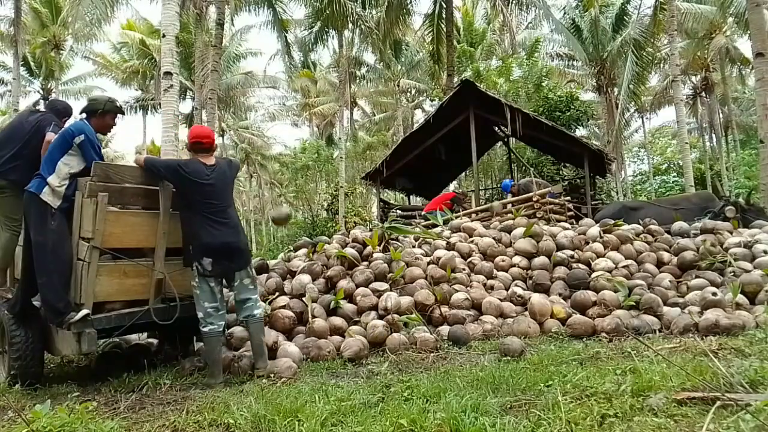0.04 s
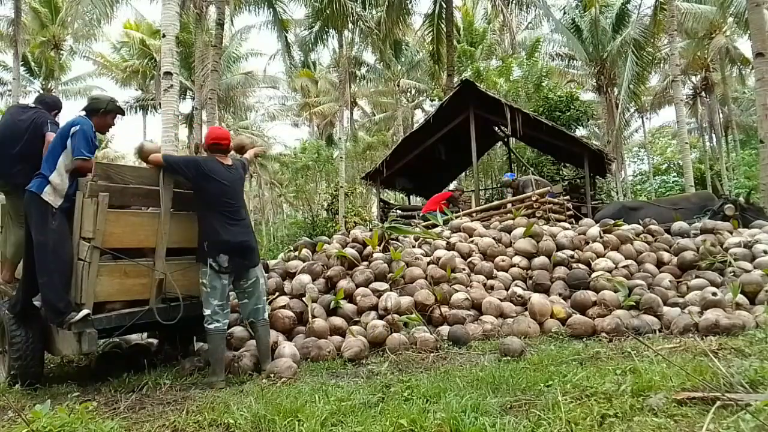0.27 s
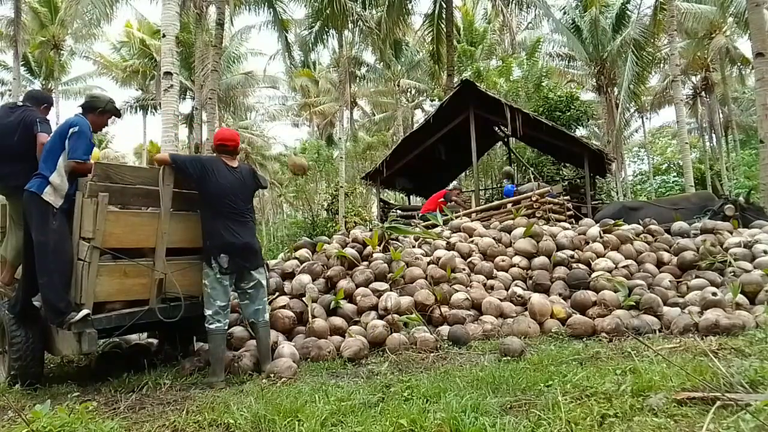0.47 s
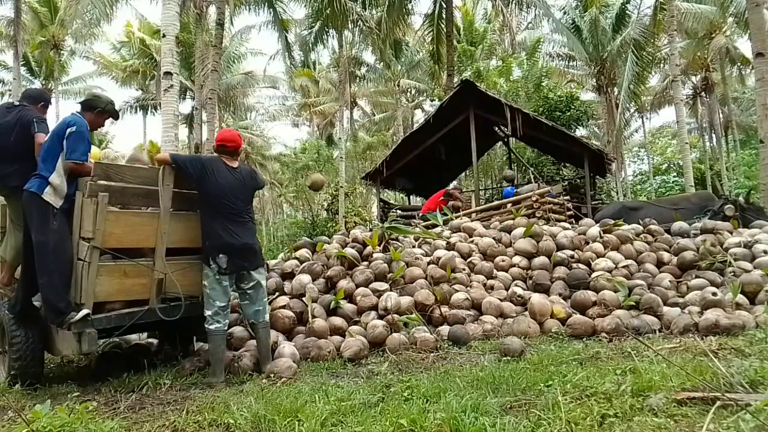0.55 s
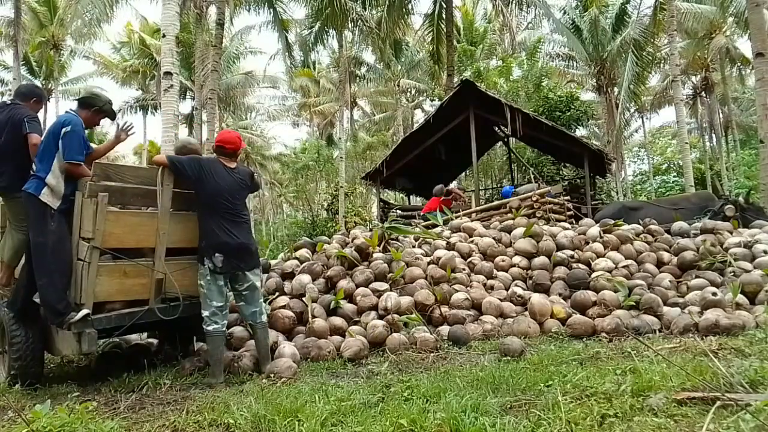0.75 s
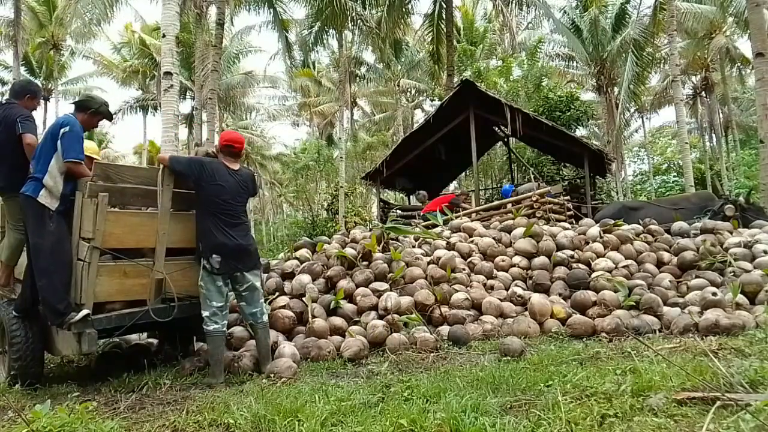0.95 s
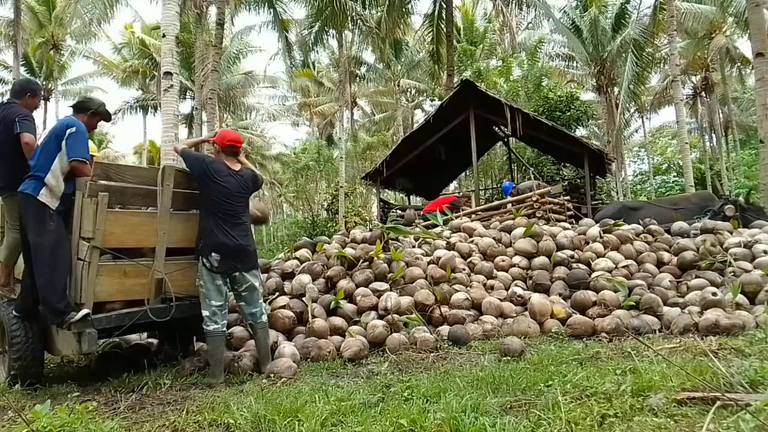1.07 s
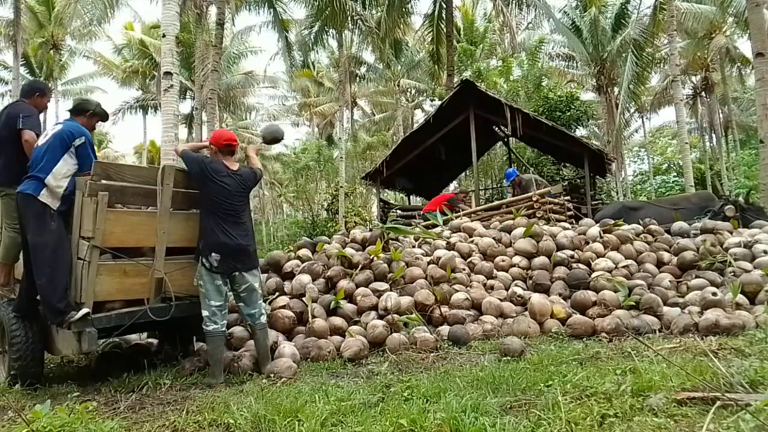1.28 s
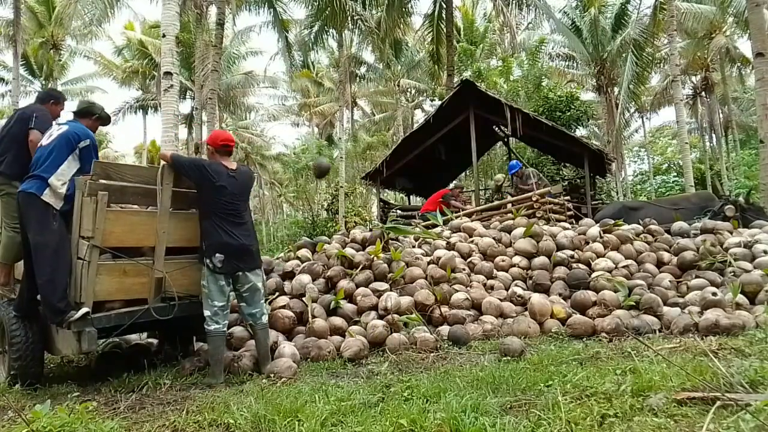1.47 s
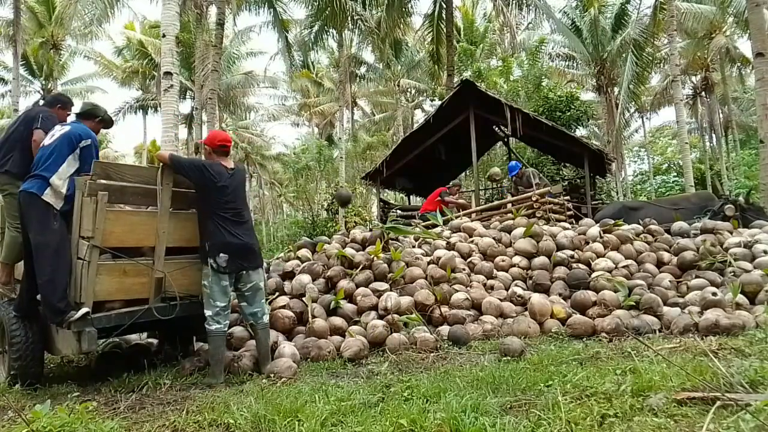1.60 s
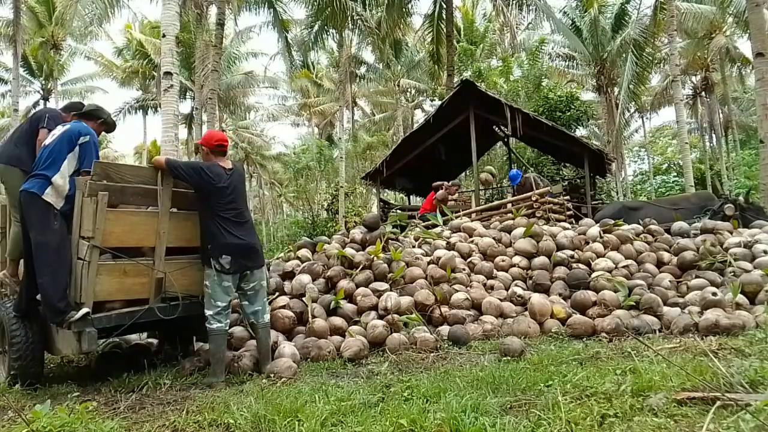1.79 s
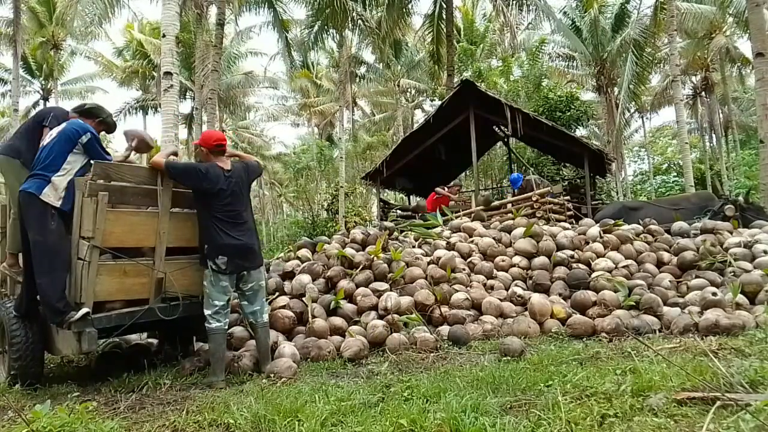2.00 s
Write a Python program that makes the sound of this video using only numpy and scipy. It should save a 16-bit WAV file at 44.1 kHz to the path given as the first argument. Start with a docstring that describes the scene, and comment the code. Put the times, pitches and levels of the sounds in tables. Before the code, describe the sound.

Coconuts tossed into a wooden cart land in three hollow, dry knocks over soft leafy rustle

```python
"""In a palm grove, husked coconuts are tossed into a wooden farm cart in front of one small microphone.
They clack on the load as ringing shell modes with bursts of husk noise; fibres snap as decaying clicks.
The plank bed thumps and the side boards knock as struck modes; nuts bump as damped notes and roll as grains.
A short ring inside the cart and a scattered echo from the palm trunks answer, over the constant rustle
and rumble of the grove and one tiny falling bird note; the microphone rings in the high treble."""
import sys
import numpy as np
from scipy import signal
from scipy.fft import rfft, irfft, next_fast_len
from scipy.io import wavfile
from scipy.ndimage import map_coordinates

SR = 44100
rng = np.random.default_rng(int(sys.argv[2]) if len(sys.argv) > 2 else 0)


def file_out(sig):
    """Save sig as 16-bit WAV at sys.argv[1]."""
    # one column per channel
    cols = np.atleast_2d(sig).T
    # limit, then scale
    lim = np.clip(cols, -1, 1)
    pcm = np.round(lim * 32767).astype(np.int16)
    wavfile.write(sys.argv[1], SR, pcm)


N = 90404
T = np.arange(SR // 2) / SR  # the half second given to each single sound, in seconds


def amp(db):
    """Decibels to gain."""
    return 10 ** (np.asarray(db) / 20)


def unit(x):
    """Scale to rms 1."""
    return x / np.sqrt(np.mean(x ** 2) + 1e-20)


def add(track, start_s, sound):
    """Mix a sound into a track at a time in seconds, cutting what runs past the end."""
    i = max(0, round(start_s * SR))
    track[i:i + len(sound)] += sound[:len(track) - i]


def coloured(x, points):
    """Causal minimum-phase filter through the given (Hz, dB) points, made by folding the cepstrum."""
    size = 2 * next_fast_len(len(x))
    hz, db = np.transpose(points)
    bin_hz = np.fft.rfftfreq(size, 1 / SR)
    response_db = np.interp(np.log(bin_hz + 1), np.log(hz), db)
    cepstrum = irfft(np.log(amp(response_db)), size)
    cepstrum[1:size // 2] *= 2
    cepstrum[size // 2 + 1:] = 0
    response = np.exp(rfft(cepstrum))
    return irfft(rfft(x, size) * response)[:len(x)]


def noise(points, size):
    """Coloured noise of rms 1."""
    return unit(coloured(rng.standard_normal(size), points))


def wobble(rate):
    """A smooth random curve through rate knots a second."""
    knots = rng.standard_normal(200)
    return map_coordinates(knots, [np.arange(N) * rate / SR], mode="wrap")


SAG_S = 0.0073  # time constant of the pitch sag


def cycles(sag):
    """A contact is stiffest at first: time as a mode counts it while its pitch relaxes from 1 + sag to 1."""
    return T + sag * SAG_S * (1 - np.exp(-T / SAG_S))


MODE_SCATTER_DB = 0.5  # each blow excites the modes a little differently


def struck(modes, pitch, crush_s, grit, sag=0):
    """Damped modes rung by one blow, then by the crumbling of the husk; grit is the crumble's rms share."""
    hz, db, t60 = np.transpose(modes)[:, :, None]
    gain = amp(db + MODE_SCATTER_DB * rng.standard_normal(hz.shape))
    decay = np.exp(-np.log(1000) * T / t60)
    ring = (gain * decay * np.sin(2 * np.pi * hz * pitch * cycles(sag))).sum(0)
    crumbling_force = rng.standard_normal(len(T)) * np.exp(-T / crush_s)
    crumble = signal.fftconvolve(crumbling_force, ring)[:len(T)]
    level = ring.std() / np.linalg.norm(gain)  # longer rings carry more
    return unit(unit(ring) + grit * unit(crumble)) * level


# The air of the grove, as the shape of its spectrum. Each row: frequency in Hz, relative level in dB per Hz.
GROVE_SPECTRUM = [(30, 16), (110, -2.5), (170, 4), (270, 2.5), (450, -0.5), (1000, -1), (2000, -5),
                  (4000, -9), (6500, -11.5), (9000, -15.5), (12500, -19.5), (16000, -28.5)]
GROVE_DB, BREEZE_DB, RUMBLE_SWELL_DB = -49.5, 0.5, 2.5  # base level; depths of the random swells


def grove():
    """Frond rustle that barely swells over an uneven low rumble, split from one coloured noise at 450 Hz."""
    air = noise(GROVE_SPECTRUM, N)
    rumble = signal.sosfiltfilt(signal.butter(2, 450, fs=SR, output="sos"), air)
    rustle = (air - rumble) * amp(BREEZE_DB * wobble(8.4))
    swelling_rumble = rumble * amp(RUMBLE_SWELL_DB * wobble(21.68))
    return amp(GROVE_DB) * (rustle + swelling_rumble)


# Nuts rolling over the load. Each row: start in seconds, length in seconds, level in dB.
ROLLS = [(0, 0.074, -52), (0.276, 0.062, -45.5), (.88, .06, -56), (.99, .09, -46), (1.07, .13, -57),
         (1.234, 0.06, -48), (1.311, 0.072, -50.5), (1.829, 0.092, -57.5)]
# Husk scraping on husk, as a filter shape. Each row: frequency in Hz, relative level in dB.
ROLLING_SPECTRUM = [(100, -6), (300, -11), (700, 1), (1350, 7), (2500, 0), (5000, -2.5), (9000, -8.5),
                    (16000, -5.5)]


def rolls():
    """Husk scrapes on husk in a short swell of fine grains of random strength."""
    out = np.zeros(N)
    for start_s, length_s, db in ROLLS:
        grains = rng.standard_normal(len(T)) * rng.exponential(size=len(T))
        swell = np.sin(np.pi * np.minimum(T / length_s, 1))
        add(out, start_s, amp(db) * swell * unit(coloured(grains, ROLLING_SPECTRUM)))
    return out


# What cart and trunks send back, as the shape of its spectrum. Each row: frequency in Hz, relative level in dB.
ECHO_COLOUR = [(100, -4), (300, -2), (700, -1), (1500, -4), (4000, -1.5), (9000, -0.5), (15000, -1.5)]
CART_DB, CART_DECAY_S = -9, 0.016
ECHO_DB, ECHO_DELAY_S, ECHO_SPREAD = -15, 0.084, 0.42  # strongest delay; spread in natural log of time


def echoes(x):
    """A short decaying ring inside the cart, then a soft cloud of noise-like returns from the palm trunks."""
    out = np.zeros(N)
    cart_ring = unit(np.exp(-T / CART_DECAY_S))
    cloud = unit(np.exp(-(np.log((T + 1 / SR) / ECHO_DELAY_S) / ECHO_SPREAD) ** 2 / 2))
    envelope = np.hypot(amp(CART_DB) * cart_ring, amp(ECHO_DB) * cloud) / np.sqrt(len(T))
    for i in range(0, N, len(T)):  # each half second gets freshly drawn returns
        returns = envelope * noise(ECHO_COLOUR, len(T))
        add(out, i / SR, signal.fftconvolve(x[i:i + len(T)], returns))
    return out


# Weight landing on the plank bed. Each row: start in seconds, level in dB, pitch ratio.
THUDS = [(.076, -37, 0.84), (0.2206, -27, 0.97), (.249, -41, 1.1), (.8238, -26.5, 0.874),
         (0.8343, -28, 0.92), (0.962, -26, .86), (1.263, -35, 1.12), (1.292, -34, 1.05), (1.334, -35, 0.89),
         (1.655, -42, 1.23), (1.770, -34, 1.3)]
# Modes of the loaded bed. Each row: frequency in Hz at pitch ratio 1, relative level in dB, 60 dB decay in seconds.
BED_MODES = [(141, -5.5, 0.054), (188, -1.5, 0.065), (250, -0.5, 0.067), (300, -0.5, 0.052),
             (397, -10, 0.099), (550, -1, 0.0084)]
BED_CRUSH_S, BED_GRIT = 0.018, 0.61


def bed_thuds():
    """The loaded plank bed thumps in low, damped modes."""
    out = np.zeros(N)
    for start_s, db, pitch in THUDS:
        add(out, start_s, amp(db) * struck(BED_MODES, pitch, BED_CRUSH_S, BED_GRIT))
    return out


# Nut on nut. Each row: start in seconds, shell level in dB, husk crack level in dB before halving,
# crush time constant in seconds, shell pitch ratio.
CLACKS = [(0.0767, -36.5, -36.5, 0.0037, .9), (0.1989, -28, -44, 0.002, 0.91),
          (0.2037, -36, -51, 0.0015, 0.78), (0.2077, -13, -15.5, 0.0015, 1),
          (0.2134, -31, -34, 0.0011, 1.24), (0.2202, -25.5, -23, 0.0023, 1.1),
          (0.2232, -22.5, -42, 0.0054, 0.88), (.247, -39, -34, 0.0039, 1.7),
          (0.8236, -24.5, -18.5, 0.0029, 1.02), (0.8332, -25, -28, 0.0038, 0.95),
          (0.8416, -32, -52, 0.0026, .92), (0.9621, -34.5, -33, 0.0027, .8),
          (0.9687, -29.5, -33, 0.011, 0.95), (1.264, -37, -49, .005, 1.06),
          (1.2912, -30, -28, 0.0044, 0.94), (1.2932, -28, -25, 0.0046, .82), (1.664, -34, -46, .005, 0.47),
          (1.671, -37.5, -48, .005, .7), (1.680, -42, -49, .004, 0.65), (1.765, -30.5, -30.5, 0.0027, 0.74),
          (1.7708, -28.5, -38, 0.011, 0.87), (1.807, -36, -40.5, 0.0076, 0.85),
          (2.039, -38.5, -45, 0.0026, 0.81)]
# Modes of the hard shell. Each row: frequency in Hz at pitch ratio 1, relative level in dB, 60 dB decay in seconds.
SHELL_MODES = [(1140, -8.5, 0.042), (1443, 2.5, 0.04), (1636, -7, 0.032), (1763, -2, 0.037),
               (1912, 1, 0.031), (2150, -4.5, .03), (2605, -3.5, 0.018), (2880, -5, 0.02),
               (3348, 0.5, 0.018), (3570, -6.5, 0.015)]
# Cracking husk, as the shape of its spectrum. Each row: frequency in Hz, relative level in dB per Hz.
HUSK_SPECTRUM = [(100, -18), (800, -11.5), (1500, 4), (2500, 0), (3500, 3.5), (4400, -1), (7500, -4),
                 (11000, -5.5), (16000, -3)]
SHELL_GRIT = 0.23
SHELL_LOWEST_HZ = 1124  # at pitch ratio 1; the shell is steeply cut below this


def clacks():
    """Each contact rings the hard shell and cracks the dry husk around it."""
    out = np.zeros(N)
    for start_s, shell_db, crack_db, crush_s, pitch in CLACKS:
        low_cut = signal.butter(8, SHELL_LOWEST_HZ * pitch, "high", fs=SR, output="sos")
        shell = signal.sosfilt(low_cut, struck(SHELL_MODES, pitch, crush_s, SHELL_GRIT))
        crack = np.exp(-T / crush_s) * noise(HUSK_SPECTRUM, len(T)) / 2
        add(out, start_s, amp(shell_db) * shell)
        add(out, start_s, amp(crack_db) * crack)
    return out


# Dry fibres snapping. Each row: start in seconds, level in dB, decay time constant in seconds, pitch ratio.
SNAPS = [(0.2081, -6, 0.00063, 0.88), (.2148, -22, .0005, 1), (0.2215, -24, 0.0023, 1.45),
         (0.8244, -19, 0.00042, 0.88), (.8363, -23, .002, 1.0), (1.2326, -20, .0013, 1.08),
         (1.2364, -26.5, 0.0018, 0.94), (1.2704, -24, .0004, 1), (1.3194, -29, 0.00055, 1.1)]
# Breaking fibre, as a filter. Each row: frequency in Hz at pitch ratio 1, level in dB.
FIBRE_SPECTRUM = [(300, -41), (1000, -22), (3300, -10), (4600, -15), (6000, -12.5), (8000, -5), (9000, -1),
                  (11000, -8.5), (16000, -9)]
SNAP_CLICK = 2.5  # force of the first break, over the splintering that follows


def snaps():
    """Husk fibres break with a thin tick and splinter briefly."""
    out = np.zeros(N)
    for start_s, db, decay_s, pitch in SNAPS:
        force = np.exp(-T / decay_s) * rng.standard_normal(len(T)) / 2
        force[0] = SNAP_CLICK
        spectrum = np.multiply(FIBRE_SPECTRUM, [pitch, 1])  # shifts the frequencies only
        add(out, start_s, amp(db) * coloured(force, spectrum))
    return out


# Nuts settling softly deep in the load. Each row: start in seconds, level in dB, settled frequency in Hz.
BUMPS = [(0.297, -32.5, 285), (0.311, -36, 149), (0.336, -42.5, 140), (0.363, -40.5, 140.3),
         (.565, -46.5, 222), (0.674, -37, 252), (0.689, -47, 148), (.905, -39, 202), (1.352, -38, 217),
         (1.414, -36, 244), (1.464, -42.5, 250), (1.658, -42, 200), (1.683, -32.5, 288), (1.816, -42, 250),
         (1.875, -40.5, 211)]
BUMP_RISE_S, BUMP_DECAY_S = 0.003, 0.012
BUMP_SAG = 0.24  # extra pitch at first contact, as a fraction


def bumps():
    """A nut cushioned by the others gives one dull, sagging, quickly damped note."""
    out = np.zeros(N)
    for start_s, db, hz in BUMPS:
        envelope = (1 - np.exp(-T / BUMP_RISE_S)) * np.exp(-T / BUMP_DECAY_S)
        note = np.sin(2 * np.pi * hz * cycles(BUMP_SAG))
        add(out, start_s, amp(db) * envelope * note)
    return out


# Hollow knocks on the side boards. Each row: start in seconds, level in dB, pitch ratio.
KNOCKS = [(1.2938, -19.5, 1.0), (1.670, -34.5, 0.85), (1.774, -33, 1.05), (1.93, -43.5, 1.02)]
# Modes of a side board. Each row: settled frequency in Hz at pitch ratio 1, relative level in dB,
# 60 dB decay in seconds.
BOARD_MODES = [(609, 0.5, 0.065), (692, -7, 0.024), (990, -2.5, .026), (1096, 3, 0.043), (1297, -8, 0.033),
               (1480, -4, 0.035)]
BOARD_CRUSH_S, BOARD_GRIT = 0.008, 0.5
BOARD_SAG = 0.088  # extra pitch at first contact, as a fraction


def board_knocks():
    """The freer side boards knock hollowly, their pitch sagging a little after contact."""
    out = np.zeros(N)
    for start_s, db, pitch in KNOCKS:
        add(out, start_s, amp(db) * struck(BOARD_MODES, pitch, BOARD_CRUSH_S, BOARD_GRIT, BOARD_SAG))
    return out


BIRD_S, BIRD_LENGTH_S, BIRD_DB = 1.509, 0.03, -55
BIRD_END_HZ, BIRD_FALL_HZ, BIRD_FALL_S = 7650, 850, 0.009  # pitch it falls towards, drop, time constant


def bird():
    """One faint, very high falling note: a sine whose frequency relaxes downward."""
    out = np.zeros(N)
    hz = BIRD_END_HZ + BIRD_FALL_HZ * np.exp(-T / BIRD_FALL_S)
    swell = np.sin(np.pi * np.minimum(T / BIRD_LENGTH_S, 1))
    note = np.sin(2 * np.pi * np.cumsum(hz) / SR)
    add(out, BIRD_S, amp(BIRD_DB) * swell * note)
    return out


def scene():
    """The cart, its echo, the grove and the bird, as one channel."""
    cart = rolls() + bed_thuds() + clacks() + snaps() + bumps() + board_knocks()
    return (grove() + cart + echoes(cart) + bird())[None]


# Response of the small microphone. Each row: frequency in Hz, gain in dB.
MICROPHONE = [(20, -35), (66, -37), (90, -18.5), (125, -5), (5000, 0), (6500, 4), (7600, 9.5), (8600, 14),
              (9200, 15), (10000, 10), (11500, 1.5), (13000, -5), (16000, -11.5)]
TOP_HZ = 16500  # nothing passes from here up


def record(dry):
    """A small microphone with no deep bass, a treble resonance and a sharp band limit."""
    x = coloured(dry[0], MICROPHONE)
    passed = np.fft.rfftfreq(2 * N, 1 / SR) < TOP_HZ
    return irfft(rfft(x, 2 * N) * passed)[None, :N]


dry = scene()
out = record(dry)
file_out(out)
```